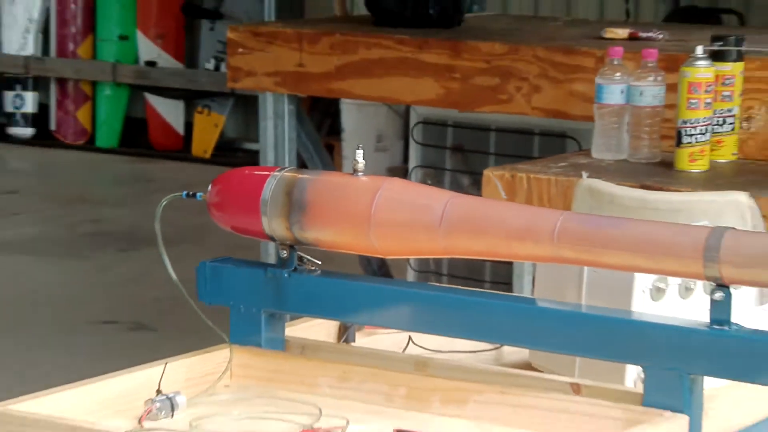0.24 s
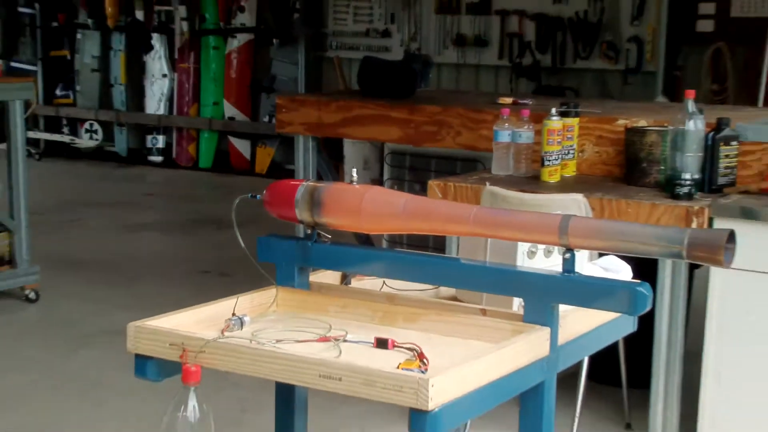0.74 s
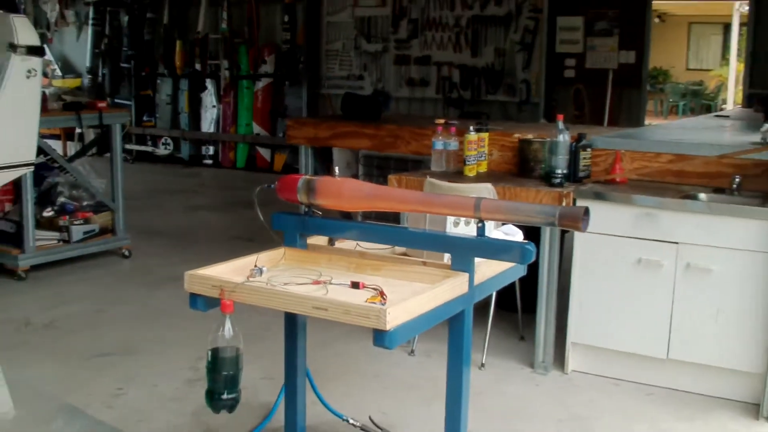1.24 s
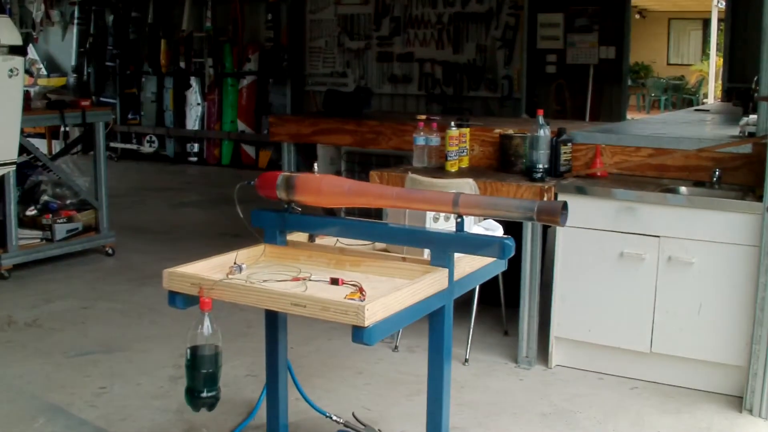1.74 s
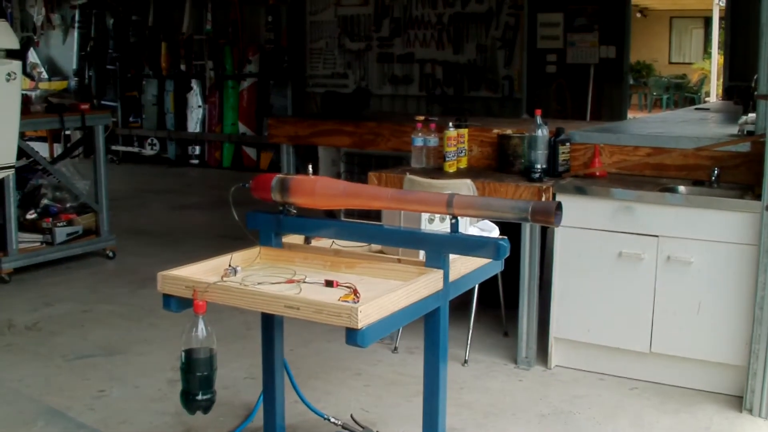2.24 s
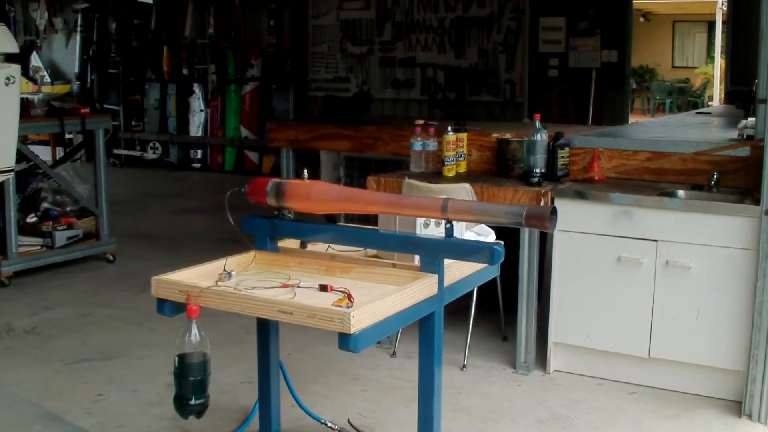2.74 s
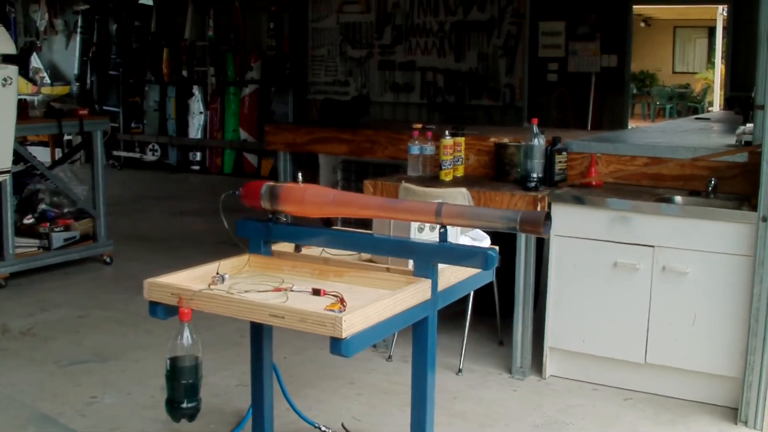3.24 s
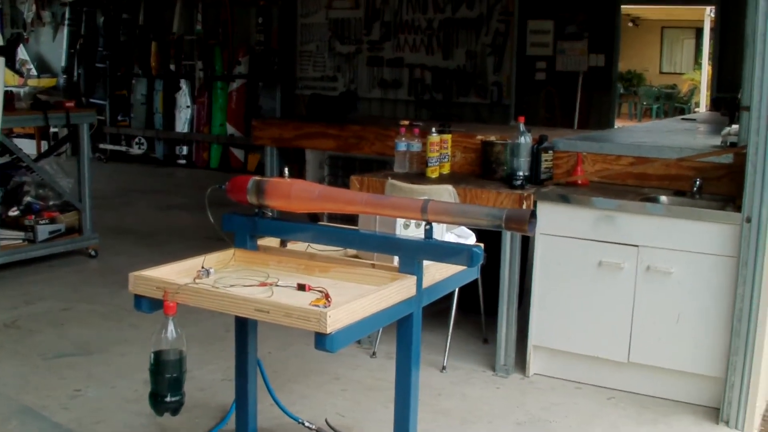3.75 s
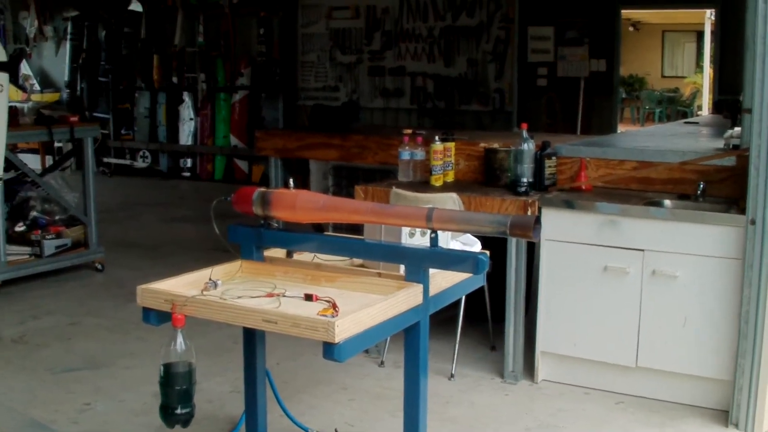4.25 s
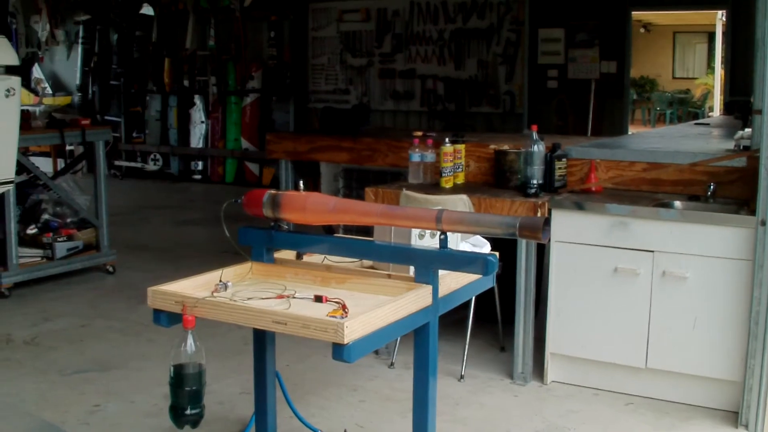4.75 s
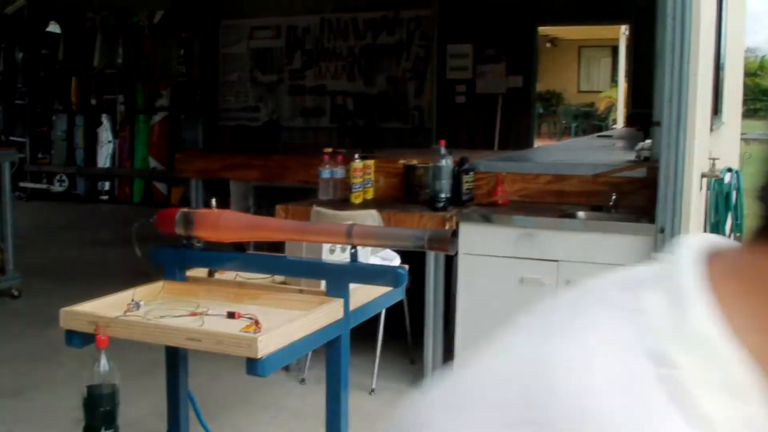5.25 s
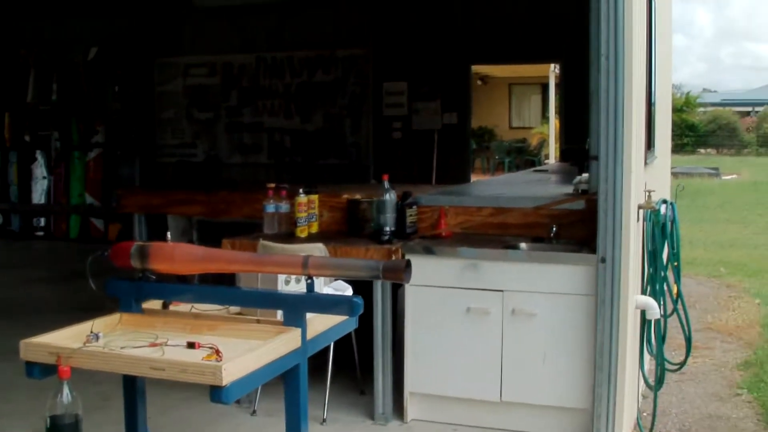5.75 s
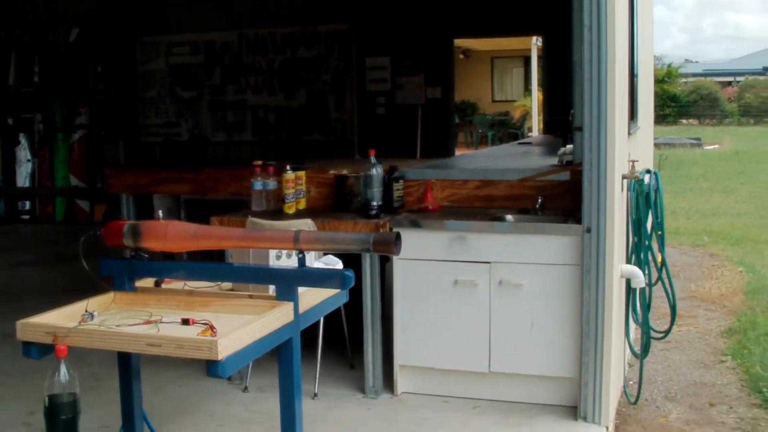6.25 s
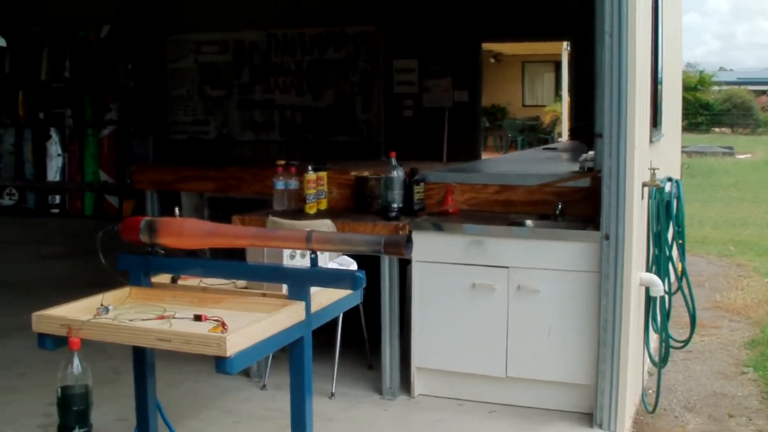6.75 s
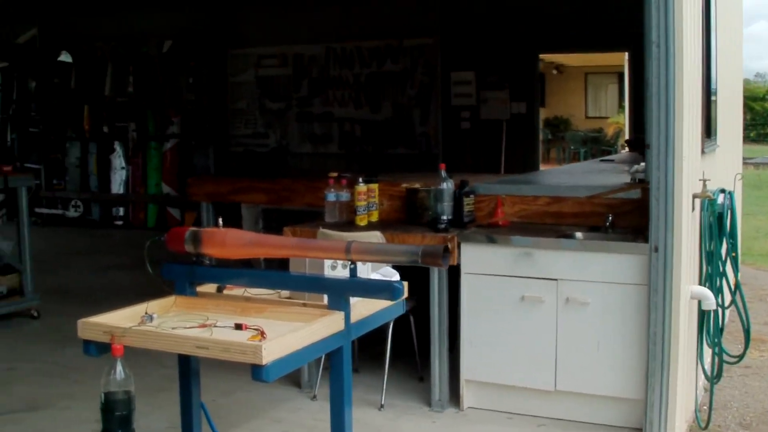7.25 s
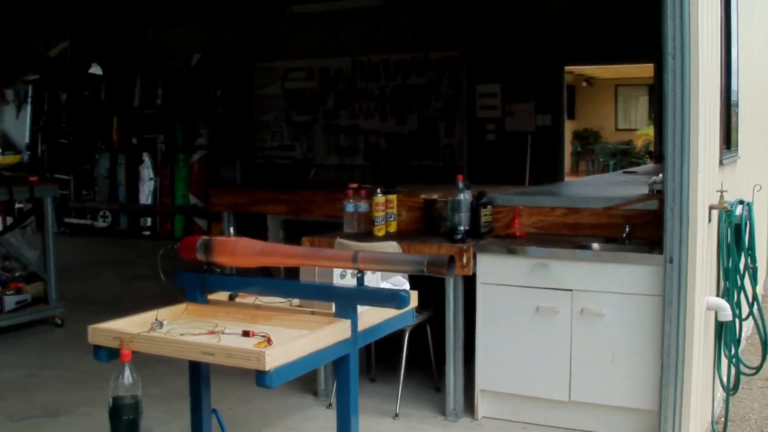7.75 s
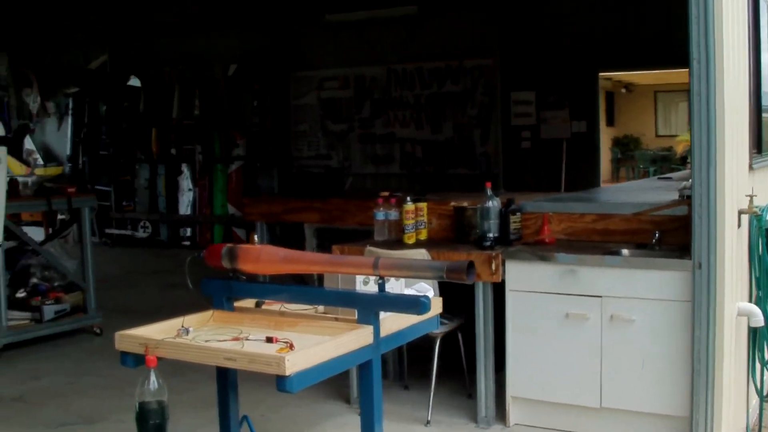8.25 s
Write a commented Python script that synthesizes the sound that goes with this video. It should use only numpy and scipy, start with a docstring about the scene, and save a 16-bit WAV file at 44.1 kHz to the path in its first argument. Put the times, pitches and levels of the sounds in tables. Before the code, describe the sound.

Unbroken pulse jet noise from a concrete-floored workshop: fast raspy firing fused into a steady tone near 800 hertz, thick rushing exhaust and gritty crackle. Level and colour flutter slightly as the microphone drifts. Just after five seconds a passing body shades the roar for a fraction of a second; afterwards the sound gains a hollow doorway ring. Faint low air rumble underneath, peaks pressed by overload.

```python
"""Pulse jet in a workshop doorway

A small pulse jet fires about 160 times a second: its tailpipe drones on the firing harmonics, and
each cycle spits a shock front and a puff of turbulent noise, heard as a broad roar and a drier crackle.
Echoes off cabinet and floor slide as the hand-held microphone drifts; someone crosses in front at
about 5 s. A dull rumble of moving air lies below, and the overdriven microphone rounds off the peaks.
"""
import sys
import numpy as np
from scipy import signal
from scipy.fft import rfft, irfft, next_fast_len
from scipy.io import wavfile
from scipy.ndimage import map_coordinates

SR = 44100
rng = np.random.default_rng(int(sys.argv[2]) if len(sys.argv) > 2 else 0)


def int16_out(signal):
    """Quantize to a 16-bit WAV file."""
    q = np.round(np.clip(np.atleast_2d(signal).T, -1, 1) * 32767)
    wavfile.write(sys.argv[1], SR, q.astype(np.int16))


N = 374849

# Echo paths. Each row: time in s, cabinet delay in ms, floor delay in ms.
PATHS = [(0, 1.22, 2.79), (1, 1.25, 2.81), (2, 1.27, 2.87), (3.3, 1.3, 2.9), (4, 1.33, 2.87),
         (5.3, 1.24, 2.77), (6.4, 1.33, 2.7), (7.2, 1.33, 2.7), (7.8, 1.28, 2.73), (8.5, 1.28, 2.68)]
# Microphone position. Each row: time in s, nearness to the door post 0-1.
AT_DOOR = [(0, 0.67), (5.4, 0.34), (5.9, 1), (8.5, 0.97)]


def amp(db):
    """Decibels to gain."""
    return 10 ** (np.asarray(db) / 20)


def unit(x):
    """Scale to rms 1."""
    return x / np.sqrt(np.mean(x ** 2) + 1e-20)


def along(points, hz):
    """Read (Hz, value) points on a log frequency axis."""
    point_hz, value = np.transpose(points)
    return np.interp(np.log(hz + 1), np.log(point_hz), value)


def curves(rows):
    """One value per sample for each column after the time."""
    knot_s, *columns = np.transpose(rows)
    return [np.interp(np.arange(N) / SR, knot_s, column) for column in columns]


def wobble(rate_hz):
    """A smooth random curve with rate_hz knots a second."""
    knots = rng.standard_normal(int(N * rate_hz / SR) + 4)
    return map_coordinates(knots, [np.arange(N) * rate_hz / SR])


def bump(centre_s, width_s):
    """A bell of height 1 around a moment."""
    return np.exp(-((np.arange(N) / SR - centre_s) / width_s) ** 2)


def filtered(x, response):
    """x times a complex response of frequency in Hz."""
    size = next_fast_len(N + SR // 2, True)
    return irfft(rfft(x, size) * response(np.fft.rfftfreq(size, 1 / SR)), size)[..., :N]


def coloured(x, spectrum, size=4096):
    """Minimum-phase filter with this (Hz, dB) spectrum, so that fronts stay sharp; rms 1."""
    cepstrum = irfft(np.log(amp(along(spectrum, np.fft.rfftfreq(size, 1 / SR)))))
    # fold the cepstrum onto positive times: a causal filter
    cepstrum[1:size // 2] *= 2
    cepstrum[size // 2 + 1:] = 0
    impulse = irfft(np.exp(rfft(cepstrum)))
    return unit(signal.fftconvolve(x, impulse)[:N])


def delayed(x, ms):
    """x after a changing delay."""
    return map_coordinates(x, [np.arange(N) - ms * SR / 1000])


def moving_air():
    """Dull low noise with a slowly wandering level, plus fainter eddies separate in each channel."""
    # Each row: frequency in Hz, relative level in dB.
    spectrum = [(15, -3), (50, -4), (100, -7), (250, 0.5), (800, -31)]
    rumble = amp(-52.5 + 1.5 * wobble(8.1)) * coloured(rng.standard_normal(N), spectrum)
    eddies = np.array([coloured(rng.standard_normal(N), spectrum) for _ in range(2)])
    return rumble + amp(-62) * eddies


def near_echoes(x, cabinet, floor):
    """The cabinet front and concrete floor comb the sound, with delays that slide as the microphone moves."""
    cabinet_ms, floor_ms = curves(PATHS)
    return unit(x + cabinet * delayed(x, cabinet_ms) + floor * delayed(x, floor_ms))


def workshop(x, wet_db, size=4096):
    """Diffuse tail of frequency-dependent decay, redrawn block by block as hot moving air reshuffles it."""
    # Each row: frequency in Hz, 60 dB decay time in s.
    decay = [(200, 0.3), (2000, 0.98), (6000, 0.52), (15000, 1)]
    window = np.sin(np.pi * np.arange(2 * size) / (2 * size))
    padded = np.pad(x, (size, 2 * size))
    wet = np.zeros(len(padded) + SR)
    for start in range(0, N + size, size):
        hz, t, z = signal.stft(rng.standard_normal(4 * size), SR, nperseg=256)
        fade = amp(-60 * t / along(decay, hz)[:, None])
        tail = signal.istft(z * fade, SR, nperseg=256)[1]
        answer = signal.fftconvolve(window * padded[start:start + 2 * size], tail)
        wet[start:start + len(answer)] += answer
    return unit(unit(x) + amp(wet_db) * unit(wet[size:size + N]))


def doorway(x):
    """Two hollow band-pass resonances come up beside the door post."""
    # Each row: centre in Hz, width in Hz, level in dB at full nearness before the overall trim.
    resonances = [(1355, 104, -2.5), (2210, 230, -9)]
    nearness, = curves(AT_DOOR)

    def response(hz):
        return sum(amp(db) * 1j * hz * width / (centre ** 2 - hz ** 2 + 1j * hz * width)
                   for centre, width, db in resonances)

    return (x + nearness * filtered(x, response)) / (1 + 0.22 * nearness)


def passer(x):
    """A passing head and shoulder throw back a very short echo that hollows the roar for a moment."""
    # Each row: time in s, echo strength 0-1, echo delay in ms.
    echo = [(5.08, 0, 0.66), (5.12, 0.2, 0.64), (5.17, 0.1, 0.7), (5.21, 0.36, 0.37), (5.33, 0, 0.54),
            (5.42, 0, 0.34)]
    strength, delay_ms = curves(echo)
    return (x + strength * delayed(x, delay_ms)) / np.sqrt(1 + strength ** 2)


def firing_cycles(drift_hz, jitter_hz):
    """Running count of cycles; no two charges burn at quite the same speed."""
    # Each row: time in s, mean firings a second.
    firing_rate = [(0, 161.1), (.5, 160.9), (2.2, 161.1), (3.3, 160.4), (3.8, 160.8), (4.1, 160.5),
                   (4.6, 160.9), (5.3, 160.8), (5.9, 160.4), (7, 160.6), (7.4, 160), (8.5, 160.3)]
    rate_hz, = curves(firing_rate)
    return np.cumsum(rate_hz + drift_hz * wobble(25) + jitter_hz * wobble(160)) / SR


def drone(cycles, third_lift_db, weak_lift_db, shake_db, flutter):
    """Pipe harmonics: strong 3rd to 5th locked to the firing, weaker ones fluttering in the turbulence."""
    # Each row: harmonic number, level in dB in front of the stand, by the door post; before weak_lift_db.
    weak_harmonics = [(1, -62, -62), (2, -39.5, -38.5), (6, -29, -35), (7, -29.5, -29.5), (8, -29.5, -33),
                      (9, -32, -29), (10, -26.5, -29), (11, -34, -32), (13, -36, -37), (14, -34, -30),
                      (15, -40, -37)]
    # The 5th, through the shed's standing waves. Each row: time in s, level in dB before its lift.
    fifth_level = [(0, -16), (1.15, -18), (1.85, -16.5), (2.2, -14.5), (2.7, -17), (3.65, -17.5),
                   (4.42, -18), (4.6, -15.5), (4.72, -17.5), (4.87, -14), (5.01, -20.5), (5.15, -16.1),
                   (5.34, -19), (5.65, -17), (7.35, -16.5), (8.5, -17.5)]
    # Each row: time in s, level of the 3rd in dB before third_lift_db.
    third_level = [(0, -36.5), (2.4, -36), (4.9, -35), (5.45, -33), (5.8, -41.5), (7.3, -34.5), (8.5, -26)]
    fifth_lift_db, fourth_db = 1.07, -22
    trade = 1.2  # loss of the 4th over gain of the 5th: its nodes lie at the peaks of the 5th
    smear_rad = np.pi / 2  # pulse spread: phase per squared step from the 5th
    last_locked = 6

    def locked(k):
        return np.sqrt(2) * np.cos(2 * np.pi * k * cycles + smear_rad * (k - 5) ** 2)

    def scattered(k):
        return np.sqrt(2) * np.cos(2 * np.pi * (k * cycles + rng.random()))

    nearness, = curves(AT_DOOR)
    fifth_db, = curves(fifth_level)
    third_db, = curves(third_level)
    third = amp(third_db + third_lift_db)
    fourth = amp(fourth_db) * np.abs(1 + trade * (1 - amp(fifth_db - fifth_db.mean())))
    fifth = amp(fifth_db + fifth_lift_db)
    strong = sum(gain * amp(shake_db * wobble(70)) * locked(k)
                 for k, gain in enumerate((third, fourth, fifth), 3))
    weak = np.zeros(N)
    for k, front_db, door_db in weak_harmonics:
        steady = locked(k) if k <= last_locked else scattered(k)  # long waves keep step with the firing
        unsteady = flutter * k * wobble(18) * scattered(k)  # hot gas bends short waves most
        weak += amp(front_db + nearness * (door_db - front_db)) * (steady + unsteady)
    return strong + amp(weak_lift_db) * weak


def blasts(cycles, force, front, fade_cycles, steady, scatter_cycles):
    """Each firing spits a steep shock front, then a puff of turbulence that fades before the next."""
    # the gas lets each one out early or late
    clock = np.clip(cycles + scatter_cycles * wobble(160), 0, None)
    firing = clock.astype(int)
    size = force[firing]
    shocks = unit(size * (np.diff(firing, prepend=0) > 0))
    puff_level = steady + size * np.exp(-(clock % 1) / fade_cycles)
    puffs = unit(puff_level * rng.standard_normal(N))
    return puffs - front * shocks


def exhaust_gains():
    """Roar and crackle follow the jet's strength; a body throws the roar back, then screens both."""
    # Each row: time in s, jet strength in dB at the microphone.
    jet_level = [(0, -12.5), (0.45, -14), (0.8, -12), (1.3, -13.6), (2.1, -14.0), (3.1, -13.5),
                 (4.1, -13.5), (4.6, -14), (5.4, -14), (5.87, -12.3), (6.05, -13.5), (6.95, -13),
                 (7.7, -15.1), (8.5, -14.3)]
    crackle_db, crackle_swing = -7, 1.2  # the crackle swings wider than the roar
    jet_db, = curves(jet_level)
    thrown = bump(centre_s=5.145, width_s=0.035)
    screen = bump(centre_s=5.25, width_s=0.062)
    roar = jet_db + 4.0 * thrown - 3 * screen
    crackle = jet_db.mean() + crackle_swing * (jet_db - jet_db.mean()) + crackle_db - 2.5 * screen
    return amp(roar), amp(crackle)


def exhaust(cycles):
    """Blasts of uneven force make a broad roar and, above it, a drier crackle."""
    # Each row: frequency in Hz, relative level in dB.
    roar_spectrum = [(40, -52), (150, -29.5), (250, -18), (400, -12), (520, -6), (680, -6.5), (1050, 1.5),
                     (1400, -0.1), (1900, -0.5), (2350, -2.1), (3100, -5.5), (4000, -11.5), (6000, -46),
                     (12000, -63)]
    # Each row: frequency in Hz, relative level in dB.
    crackle_spectrum = [(1200, -23), (2400, 7), (3300, 3), (4000, 1.5), (5000, -1.5), (7000, -9.5),
                        (10000, -15.5), (15500, -24.5)]
    roar_gain, crackle_gain = exhaust_gains()
    floor_ms = curves(PATHS)[1]
    firings = np.arange(int(cycles[-1]) + 10)
    # random force, with a slight strong-weak alternation
    force = amp(rng.uniform(-3.6, 3.6, len(firings)) + .25 * (-1) ** firings)

    roar = blasts(cycles, force, front=.5, fade_cycles=.21, steady=.16, scatter_cycles=.045)
    roar = near_echoes(coloured(roar, roar_spectrum), cabinet=.22, floor=.24)
    roar = passer(doorway(workshop(roar, wet_db=-1.5)))

    # the plume scrambles short waves off the floor: a second rasp about halfway through each cycle
    direct, bounced = [blasts(arrival, force, front=.4, fade_cycles=.15, steady=.18, scatter_cycles=.028)
                       for arrival in (cycles, delayed(cycles, floor_ms))]
    crackle = coloured(direct + 1.19 * bounced, crackle_spectrum)
    crackle = workshop(near_echoes(crackle, cabinet=0.018, floor=0.12), wet_db=-10.5)

    surge_db = .68 * wobble(30)  # flame surges move both together
    return amp(surge_db) * (roar_gain * roar + crackle_gain * crackle)


def scene():
    """The engine, the same in both channels, over the moving air."""
    air = moving_air()
    cycles = firing_cycles(drift_hz=.12, jitter_hz=.9)
    pipe = drone(cycles, third_lift_db=-1.5, weak_lift_db=0.47, shake_db=0.5, flutter=0.016)
    return pipe + exhaust(cycles) + air


def record(dry):
    """Microphone: peaks rounded, positive ones sooner; faint opposite-phase noise; a sharp band limit."""
    top_hz = 15760
    ceiling = np.where(dry > 0, .76, .9)
    pressed = dry / (1 + np.abs(dry / ceiling) ** 6) ** (1 / 6)
    # high-passed distortion: the bass stays clean
    pressed = dry + filtered(pressed - dry, lambda hz: hz ** 4 / (hz ** 4 + 550 ** 4))
    width_spectrum = [(400, 4), (2500, -24), (6000, -5.5), (9000, 12.5), (15500, 13)]  # Hz, relative dB
    width = amp(-47.0) * coloured(rng.standard_normal(N), width_spectrum)
    return filtered(pressed + np.array([width, -width]), lambda hz: hz < top_hz)


dry = scene()
out = record(dry)
int16_out(out)
```